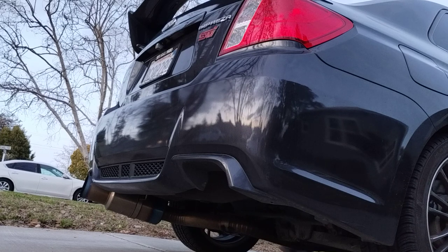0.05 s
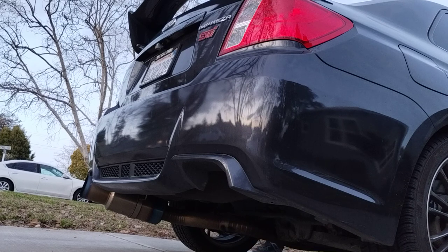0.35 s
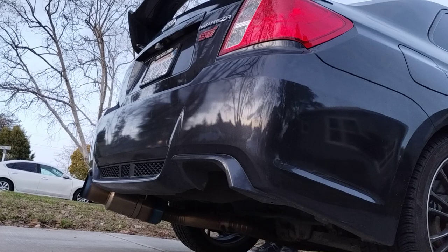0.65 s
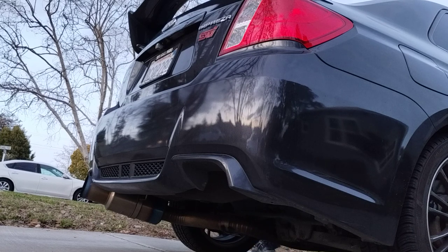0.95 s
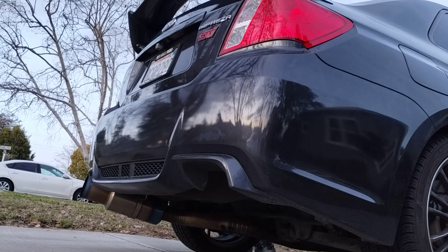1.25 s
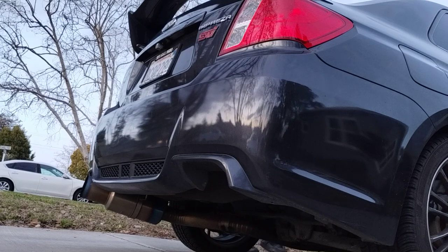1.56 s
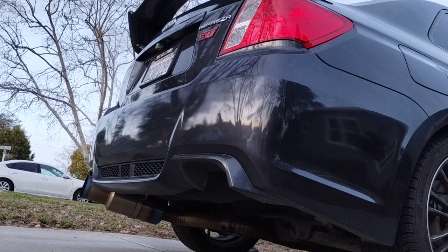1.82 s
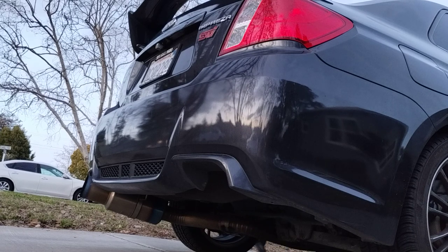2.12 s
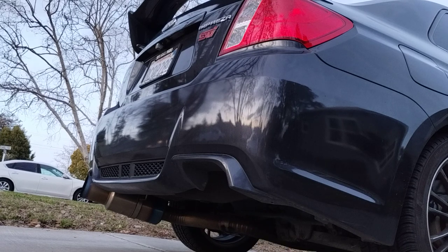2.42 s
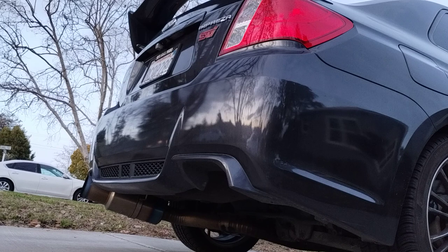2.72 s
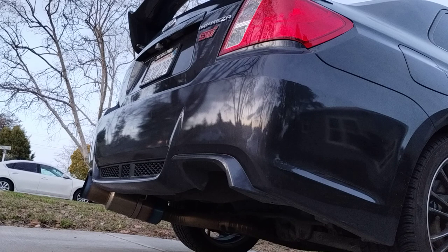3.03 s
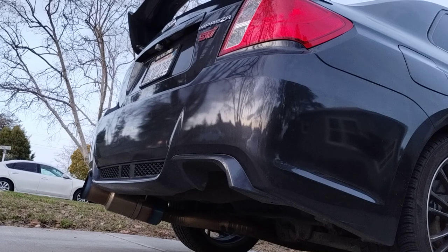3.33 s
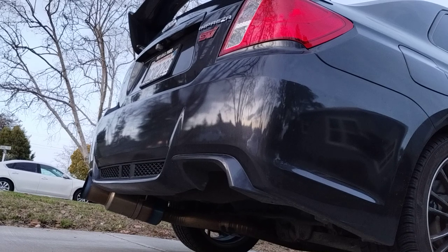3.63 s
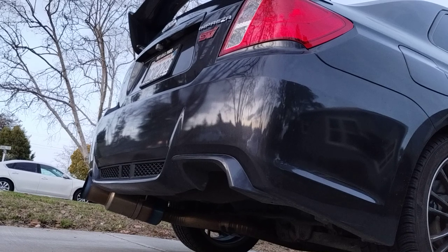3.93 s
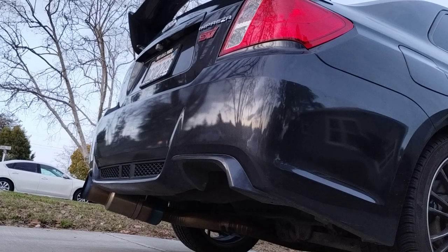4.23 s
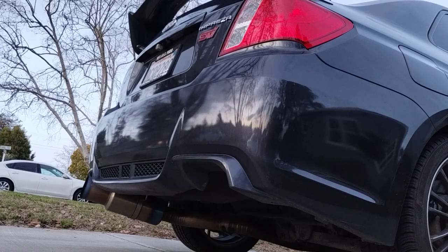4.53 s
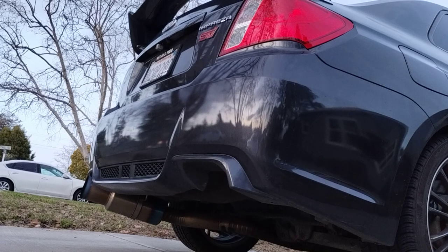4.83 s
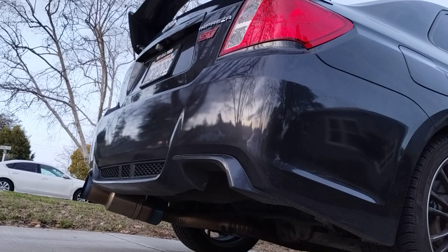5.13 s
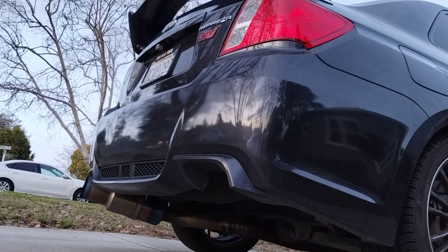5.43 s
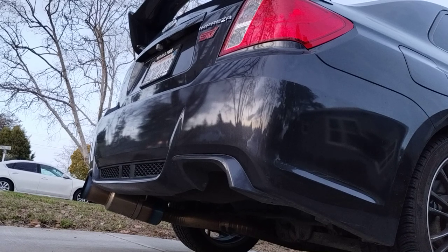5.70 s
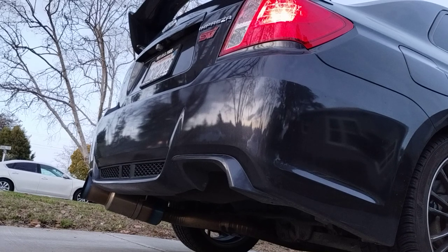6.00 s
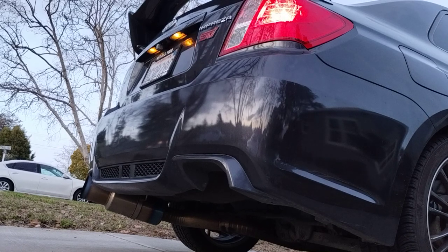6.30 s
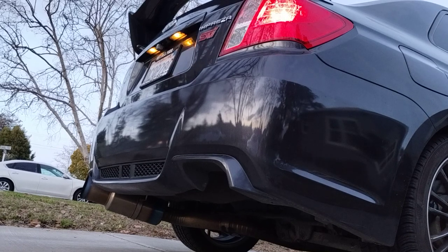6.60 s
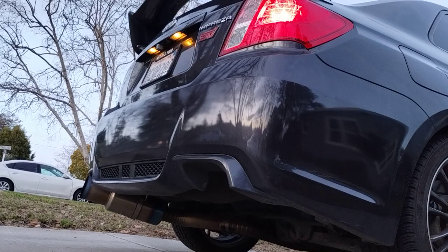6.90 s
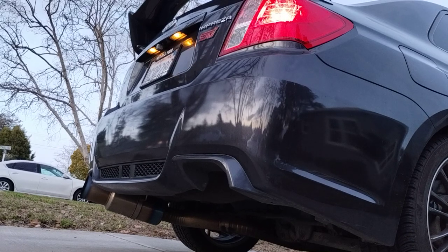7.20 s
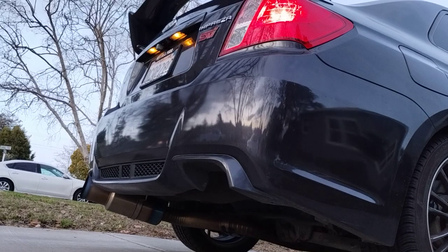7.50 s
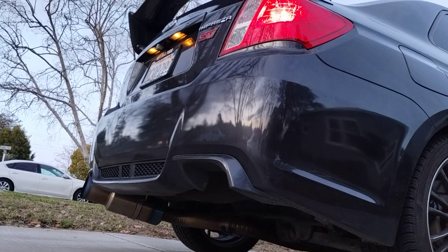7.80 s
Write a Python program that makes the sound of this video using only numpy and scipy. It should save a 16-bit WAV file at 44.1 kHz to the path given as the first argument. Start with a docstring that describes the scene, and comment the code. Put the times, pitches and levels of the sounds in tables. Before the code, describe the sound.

Heard from low behind a parked car on a quiet street, with a faint hum of distant traffic. A few soft steps and clicks come first, then the door latch clacks open. Someone climbs in with muffled thuds, faint cloth rustle and a light jingle of keys. The door slams with a deep boom. After a pause the starter clashes in and cranks the engine with a grinding whine, without it firing yet.

```python
"""Low behind a parked car on a quiet street, distant traffic hums throughout. Someone steps up, the latch
clacks and the door rings as it springs open. They climb in: cloth rustles, keys jingle and their weight
thuds into the body. A far bird calls faintly, then the door slams and the cabin booms at its resonances.
Last, the starter pinion clashes into the flywheel and its meshing teeth growl and whine, cranking the
engine over its first compressions while each unfired stroke puffs through the silencer."""
import sys
import numpy as np
from scipy import signal
from scipy.fft import rfft, irfft, next_fast_len
from scipy.io import wavfile
from scipy.ndimage import map_coordinates

SR = 44100
rng = np.random.default_rng(int(sys.argv[2]) if len(sys.argv) > 2 else 0)


def master(y):
    """Save y as 16-bit WAV."""
    cut = np.clip(np.atleast_2d(y).T, -1, 1)
    pcm = np.round(cut * 32767)  # scale
    wavfile.write(sys.argv[1], SR, pcm.astype(np.int16))


N = 350595
TIME = np.arange(N) / SR

# Decibels in all tables are relative: each source adds its own gain.
# the door lands: start_s, level_db
SLAM = [(5.38, -14.5)]
# cylinders pass their compression and push air down the pipe: start_s, puff_db, chuff_db, jolt_db
STROKES = [(7.467, -55, -51.5, 4.5), (7.645, -32, -48.5, 7), (7.821, -36, -49, 10.5)]
# spectrum of a hollow knock: frequency_hz, density_db
KNOCK_SPECTRUM = [(130, -32), (220, -4.5), (275, -5), (381, -3.5), (459, -15.5), (579, -9), (873, -19.5),
                  (1400, -25), (1820, -35), (3080, -120)]
# spectrum of the door's metal fittings: frequency_hz, density_db
CLACK_SPECTRUM = [(470, -27), (800, -5), (937, -9.5), (1180, -2.5), (1270, -6.5), (1480, -2.5),
                  (1960, -5.5), (2330, -5.5), (2680, -8.5), (2880, -6), (3310, -20), (6500, -21.5),
                  (8450, -40), (14300, -120)]
# left-right likeness of the engine bay: frequency_hz, correlation
ENGINE_LIKENESS = [(60, 1), (130, 0.98), (290, 0.92), (640, 0.36), (1410, -0.32), (3100, 0.17),
                   (6820, -0.28), (15000, -1.1)]
# left-right likeness of the door and cabin: frequency_hz, correlation
DOOR_LIKENESS = [(60, 1), (180, 1), (550, 0.7), (1650, 0.096), (4970, 0.018), (15000, 0.027)]
# left-right likeness of the street: frequency_hz, correlation
STREET_LIKENESS = [(60, 0.96), (150, 0.96), (380, 0.46), (950, -0.37), (2380, 0.029), (5980, -0.074),
                   (15000, -0.012)]


def amp(db):
    """Amplitude ratio of a level in decibels."""
    return np.exp(np.asarray(db) * (np.log(10) / 20))


def unit(x):
    """Normalisation to rms 1."""
    return x / np.sqrt(np.mean(x ** 2) + 1e-20)


def since(start_s):
    """Seconds elapsed since start_s, zero before it."""
    return np.maximum(TIME - start_s, 0)


def along(points, hz):
    """Interpolation of (frequency_hz, value) points on a logarithmic frequency axis."""
    frequencies, values = np.transpose(points)
    return np.interp(np.log(hz + 1), np.log(frequencies + 1), values)


def curve(points):
    """Linear interpolation of (time_s, value) points at every sample."""
    return np.interp(TIME, *np.transpose(points))


def wobble(rate_hz, size=N):
    """Smooth random modulation: a spline through rate_hz Gaussian knots a second."""
    knots = rng.standard_normal(int(size * rate_hz / SR) + 4)
    return map_coordinates(knots, [TIME[:size] * rate_hz])


def add(track, start_s, sound):
    """Superposition of a sound on the track from start_s."""
    part = track[:, max(round(start_s * SR), 0):][:, :sound.shape[-1]]
    part += sound[..., :part.shape[1]]


def filtered(x, response):
    """Linear filtering: the spectrum of x is multiplied by a frequency response."""
    size = x.shape[-1]
    padded = next_fast_len(size + 8192)
    return irfft(rfft(x, padded) * response(np.fft.rfftfreq(padded, 1 / SR)), padded)[..., :size]


def coloured(pair, spectrum, likeness):
    """Mid-side mixing gives two independent signals this spectrum and correlation, at rms 1."""
    def response(hz):
        angle = np.arccos(np.clip(along(likeness, hz), -1, 1)) / 2
        return amp(along(spectrum, hz)) * [np.cos(angle), np.sin(angle)]
    mid, side = filtered(pair, response)
    return unit(np.array([mid + side, mid - side]))


def burst(spectrum, likeness, attack_s, t60_s):
    """Modal overlap: a struck part with many close modes rings as decaying noise."""
    t = TIME[:SR // 4]
    rise = 1 - np.exp(-t / attack_s)
    envelope = rise * amp(-60 * t / t60_s)
    sound = rise * coloured(envelope * rng.standard_normal((2, len(t))), spectrum, likeness)
    return unit(sound) * np.sqrt(np.mean(envelope ** 2)) / envelope.max()


def ring(modes, attack_s):
    """Free vibration of damped modes, peak 1; higher modes differ more in phase between channels."""
    t = TIME[:SR // 2]
    sound = np.zeros((2, len(t)))
    for hz, db, t60_s in modes:
        phase = hz / 1500 * rng.standard_normal((2, 1))
        sound += amp(db - 60 * t / t60_s) * np.sin(2 * np.pi * hz * t + phase)
    sound *= 1 - np.exp(-t / attack_s)
    return sound / np.abs(sound).max()


def thump(hz, attack_s, t60_s):
    """Response of a damped low resonance to one push, peak 1."""
    t = TIME[:SR // 2]
    sound = np.sin(2 * np.pi * hz * t) * (1 - np.exp(-t / attack_s)) ** 2 * amp(-60 * t / t60_s)
    return sound / np.abs(sound).max()


def street():
    """Ambient noise: far traffic merges into a gently swelling hum under a faint, even hiss."""
    # spectra of the traffic and the hiss: frequency_hz, density_db
    hum_spectrum = [(15, -61), (25, -22), (54, -16), (75, -4.5), (124, 0), (162, -8), (262, -11),
                    (324, -17), (409, -14), (468, -17.5), (1380, -31.5), (2500, -42), (3250, -63),
                    (5500, -120)]
    hiss_spectrum = [(880, -23), (1500, -9.5), (2400, -9), (2540, -7.5), (3120, -8.5), (4440, -9.5),
                     (5670, -10), (7380, -10.5), (8710, -8), (15500, -17)]
    # swell of the traffic: time_s, level_db
    traffic = [(0.0, -58.5), (0.8, -56), (1.3, -56), (2.0, -56.5), (3.0, -60.5), (4.3, -56.5), (6.2, -56),
               (7.0, -56.5)]
    hum = coloured(rng.standard_normal((2, N)), hum_spectrum, STREET_LIKENESS)
    hiss = coloured(rng.standard_normal((2, N)), hiss_spectrum, STREET_LIKENESS)
    return amp(curve(traffic) - 2 + wobble(6.6)) * hum + amp(-78) * hiss


def bird():
    """Frequency modulation: thin whistles glide up and level off, made buzzy by random pitch scatter."""
    # a far bird's calls: start_s, length_s, start_hz, level_db
    calls = [(4.74, 0.21, 7120, -73.5), (4.99, 0.097, 7450, -73.5)]
    top_hz, glide_s, attack_s, scatter = 7500, 0.05, 0.0066, 0.045
    out, t = np.zeros((2, N)), TIME[:SR // 2]
    for start_s, length_s, start_hz, db in calls:
        swell = (1 - np.exp(-t / attack_s)) * np.exp(-(t / length_s) ** 2)
        flutter_db = 3.1 * wobble(56, len(t))
        buzz = np.array([wobble(2000, len(t)), wobble(2000, len(t))])
        glide_hz = top_hz + (start_hz - top_hz) * np.exp(-t / glide_s)
        cycles = np.cumsum(glide_hz * (1 + scatter * buzz), axis=1) / SR
        add(out, start_s, amp(db + flutter_db) * swell * np.sin(2 * np.pi * cycles))
    return out


def reverberation(sound):
    """Diffuse reflection from house fronts and trees: convolution with a decaying noise tail."""
    # reverberation time outdoors: frequency_hz, t60_s
    decay_times = [(100, 0.94), (500, 0.64), (2500, 0.99), (10000, 0.56)]
    tail_spectrum = [(100, -6), (2500, -13.5), (10000, -10.5)]  # frequency_hz, density_db
    hz, t, bands = signal.stft(rng.standard_normal((2, SR)), SR, nperseg=256)
    decay = amp(-60 * t / along(decay_times, hz)[:, None])
    _, tail = signal.istft(bands * decay, SR, nperseg=256)
    tail = coloured(tail, tail_spectrum, STREET_LIKENESS) / np.sqrt(SR)
    return signal.fftconvolve(sound, tail, axes=1)[:, :N]


def rustle():
    """Stick-slip friction: cloth slides on cloth in tiny uneven slips; each move rises, holds and fades."""
    # a sleeve or the seat cloth slides: start_s, length_s, level_db
    moves = [(0.905, 0.28, -81.5), (1.666, 0.66, -85.5), (1.825, 0.13, -73.5), (2.624, 0.01, -64.5),
             (2.707, .14, -68.5), (3.086, 0.38, -77), (3.308, 0.071, -69)]
    # spectrum of rubbing cloth: frequency_hz, density_db
    cloth_spectrum = [(880, -45), (1500, -1), (1700, -10), (2240, 0), (2860, 1.5), (3650, -5), (4990, -4),
                      (6960, -2.5), (8970, 5), (11000, -7), (11800, -9), (15500, -20.5)]
    attack_s, release_s = 0.006, 0.025
    climb_start_s, climb_end_s, fade_s = 1.4, 3.72, 0.35
    level = amp(-82.5) * (TIME > climb_start_s) * np.exp(-since(climb_end_s) / fade_s)  # faint shuffling
    for start_s, length_s, db in moves:
        move = (1 - np.exp(-since(start_s) / attack_s)) * np.exp(-since(start_s + length_s) / release_s)
        level = np.hypot(level, amp(db) * move)  # incoherent sounds add in power
    slips = rng.standard_normal((2, N)) * amp(2.2 * wobble(150) + 0.96 * wobble(24.27))
    return amp(4) * level * coloured(slips, cloth_spectrum, DOOR_LIKENESS)


def keys():
    """Light collisions excite the high modes of a bunch of keys in a soft shimmer."""
    # the bunch swings: start_s, level_db
    jingles = [(1.289, -64), (1.9294, -74), (2.1919, -68), (2.326, -67), (3.1094, -68), (3.2796, -57),
               (4.929, -69), (5.1637, -74)]
    # spectrum of the keys: frequency_hz, density_db
    key_spectrum = [(9500, -18), (10450, -20), (10760, 3), (11100, -25), (13100, -36), (13550, -11),
                    (13950, -28), (14550, -13), (15500, -24)]
    out = np.zeros((2, N))
    for start_s, db in jingles:
        add(out, start_s, amp(db - 7) * burst(key_spectrum, DOOR_LIKENESS, attack_s=0.0051, t60_s=0.29))
    return out


def clinks():
    """Modal ringing: light taps sound the same few modes of one small, loose metal part."""
    # taps on the part: start_s, level_db
    taps = [(2.04, -62.5), (2.24, -64), (2.975, -59), (3.19, -65), (5.559, -49)]
    # its modes: pitch_hz, level_db, t60_s
    modes = [(2190, -4, 0.067), (2344, -2, 0.076), (2536, -12, 0.027), (2820, -6, 0.041)]
    out = np.zeros((2, N))
    for start_s, db in taps:
        add(out, start_s, amp(db) * ring(modes, attack_s=0.0032))
    return out


def cabin():
    """Cavity resonance: the cabin rumbles under shifting weight, and the slam leaves it booming."""
    # spectrum of the cabin: frequency_hz, density_db
    boom_spectrum = [(30, -23), (45, -4.5), (62, 2.5), (95, 7.5), (135, 0), (200, -3), (300, -13.5),
                     (420, -12.5), (600, -18), (1300, -33), (3000, -45), (6000, -51.5)]
    attack_s, t60_s = 0.008, 0.88
    sway_start_s, sway_end_s = 1.4, 6.2
    t = since(SLAM[0][0])
    boom = (1 - np.exp(-t / attack_s)) * amp(-31 - 60 * t / t60_s)
    sway = amp(-62.5 + 3.5 * wobble(12)) * (TIME > sway_start_s) * (TIME < sway_end_s)
    return np.hypot(boom, sway) * coloured(rng.standard_normal((2, N)), boom_spectrum, DOOR_LIKENESS)


def clacks():
    """Inelastic bounces: metal parts clack and click; the click weakens faster, so a rattle grows duller."""
    # handle, latch and door fittings: start_s, clack_db, click_db, rattle_s
    contacts = [(0.598, -55.5, -76, .01), (0.6904, -64, -68.5, .01), (0.7653, -54.5, -63.5, .01),
                (0.846, -54, -66, .01), (1.4767, -67, -69, .01), (1.5671, -33.5, -47.5, .01),
                (1.5799, -34.5, -43.5, .03), (1.6241, -36.5, -64, .01), (1.7194, -60, -68, .03),
                (2.9444, -55, -69, .01), (3.314, -57, -59, .05), (5.3342, -44, -38.5, .01),
                (5.3565, -47, -43.5, .05), (5.483, -59, -55.5, .01), (5.5206, -43, -54, .03)]
    # spectrum of the sharp click: frequency_hz, density_db
    click_spectrum = [(2940, -32), (5000, -19), (5340, -36), (6310, -19.5), (7510, -20), (8910, -8.5),
                      (9300, -9), (10200, -21), (10900, -21), (12300, -31), (15500, -34)]
    gap_s, clack_loss_db, click_loss_db = 0.019, 1.94, 8  # per bounce
    out = np.zeros((2, N))
    for start_s, clack_db, click_db, rattle_s in contacts:
        for bounce, delay_s in enumerate(np.arange(0, rattle_s, gap_s)):
            clack = burst(CLACK_SPECTRUM, DOOR_LIKENESS, attack_s=0.00053, t60_s=0.18)
            click = burst(click_spectrum, DOOR_LIKENESS, attack_s=0.00053, t60_s=0.13)
            add(out, start_s + delay_s, amp(clack_db - bounce * clack_loss_db - 11) * clack)
            add(out, start_s + delay_s, amp(click_db - bounce * click_loss_db - 3.5) * click)
    return out


def thuds():
    """Soft, heavy impacts excite mainly low modes: the body booms, a panel knocks and fittings shake."""
    # steps, shifting weight and the door meeting its seal: start_s, thud_db, knock_db
    impacts = [(0.653, -32, -48), (0.682, -36, -45), (0.757, -47, -48), (1.41, -63, -59),
               (2.143, -36.5, -54.5), (3.274, -35, -55.5), (3.749, -42, -51), (3.908, -39.5, -56),
               (4.144, -57, -57), (4.263, -38, -57), (4.829, -39, -64.5), (5.036, -36, -64),
               (5.353, -20.5, -30), (5.527, -44, -40.5), (5.555, -37.5, -62), (5.632, -35, -47)]
    # spectrum of the body's thud: frequency_hz, density_db
    thud_spectrum = [(26, -35), (45, -11.5), (93, 7), (300, -23.5), (390, -55), (660, -120)]
    panel_spectrum = np.array(KNOCK_SPECTRUM) * [338 / 385, 1]  # the knock, shifted down in pitch
    settle_s, settle_loss_db = 0.042, 11.5  # each weight lands a second time, softer
    out = np.zeros((2, N))
    for start_s, thud_db, knock_db in impacts:
        add(out, start_s, amp(thud_db - 8) * thump(hz=149.4, attack_s=0.0025, t60_s=0.074))
        fittings = burst(CLACK_SPECTRUM, DOOR_LIKENESS, attack_s=0.0012, t60_s=0.22)
        add(out, start_s + 0.006, amp(knock_db - 18.5) * fittings)
        for landing_s, loss_db in [(start_s, 0), (start_s + settle_s, settle_loss_db)]:
            body = burst(thud_spectrum, DOOR_LIKENESS, attack_s=0.0024, t60_s=0.23)
            panel = burst(panel_spectrum, DOOR_LIKENESS, attack_s=0.0016, t60_s=0.17)
            add(out, landing_s, amp(thud_db - loss_db - 7.5) * body + amp(knock_db - loss_db) * panel)
    return out


def door():
    """Impulse excitation: the door rings as it springs open, then catches and lands with one deep push."""
    # the door springs off its seal: start_s, ring_db, knock_db
    releases = [(1.573, -28.5, -34.5), (1.588, -27, -35.5), (1.621, -36, -37.5), (1.655, -50, -47)]
    # the latch hooks the striker: start_s, level_db
    catches = [(5.3322, -35)]
    # modes of the free door, the striker, and the shut door with the cabin: pitch_hz, level_db, t60_s
    open_modes = [(111, -4.5, 0.64), (161.2, 5.5, 0.23), (265, -4.5, 0.12), (371, -8, 0.17),
                  (731, -11, 0.11), (1220, -27, 0.095), (1655, -24, .2), (2304, -20, 0.17),
                  (2940, -17, .11), (2960, -10, 0.13)]
    striker_modes = [(640, -2.5, 0.14), (1237, -7, 0.17), (1454, -16, 0.12), (1433, -10, 0.13),
                     (1660, -13, 0.25), (4480, -1.5, 0.035), (6500, -22, 0.074), (7670, -9, .1),
                     (8560, -8, .09), (8900, 5.5, 0.12)]
    shut_modes = [(68.9, 1, 0.5), (185, -22, 0.49), (253.4, -24.5, 1.8), (334, -10, 0.47), (358, -20, 0.33),
                  (552, -4.5, 0.14)]
    out = np.zeros((2, N))
    for start_s, ring_db, knock_db in releases:
        add(out, start_s, amp(ring_db - 1) * ring(open_modes, attack_s=0.0042))
        knock = burst(KNOCK_SPECTRUM, DOOR_LIKENESS, attack_s=0.0021, t60_s=0.16)
        add(out, start_s, amp(knock_db - 5.5) * knock)
    for start_s, db in catches:
        add(out, start_s, amp(db + 2.5) * ring(striker_modes, attack_s=0.0048))
    for start_s, db in SLAM:
        add(out, start_s, -amp(db - 8.5) * ring(shut_modes, attack_s=0.00078))
        add(out, start_s, -amp(db) * thump(hz=136, attack_s=0.00029, t60_s=0.063))
    return out


def exhaust():
    """Resonance of the silencer: each unfired stroke puffs through it and rings one low note."""
    out = np.zeros((2, N))
    for start_s, puff_db, chuff_db, _ in STROKES:
        puff = thump(hz=87.3, attack_s=0.0055, t60_s=0.2)
        chuff = burst(KNOCK_SPECTRUM, ENGINE_LIKENESS, attack_s=0.0029, t60_s=0.44)
        add(out, start_s, amp(puff_db + 2) * puff)
        add(out, start_s, amp(chuff_db + 5.5) * chuff)
    return out


def pinion():
    """Broadband impacts: the solenoid throws the pinion in; it bites again when the flywheel slows."""
    # the pinion strikes the ring gear: start_s, level_db
    strikes = [(7.431, -27), (7.4481, -19.5), (7.4554, -20.5), (7.4681, -13.5), (7.4754, -17.5),
               (7.82, -35)]
    # spectrum of the clashing teeth: frequency_hz, density_db
    clash_spectrum = [(59, -43.5), (100, -4), (188, -0.5), (313, -27), (487, -1), (917, -4), (1040, -13),
                      (1210, 2.5), (2470, -7), (3120, -3), (3390, -4.5), (5630, -15.5), (9540, -10),
                      (10600, -23), (15500, -31)]
    out = np.zeros((2, N))
    for start_s, db in strikes:
        clash = burst(clash_spectrum, ENGINE_LIKENESS, attack_s=0.0026, t60_s=0.08)
        add(out, start_s, amp(db - 13.5) * clash)
    return out


def bell_housing(grinding):
    """Forced vibration: grinding teeth drive the housing's modes as parallel resonators, at rms 1."""
    # modes of the housing: pitch_hz, bandwidth_hz, level_db
    modes = [(385, 47, -5), (486, 39, -8), (833, 23, -10), (1076, 68, 0.5), (1190, 21, -14),
             (1557, 28, 1.5), (2283, 25, 7.5), (2335, 21, 1), (2410, 53, -2), (2765, 17, 10),
             (2940, 67, -2.5), (3020, 19, -4), (3250, 32, -20), (3650, 23, -11)]
    drive_spectrum = [(150, -22), (400, 7), (3800, -4), (6000, -27)]  # frequency_hz, density_db

    def response(hz):
        return sum(amp(db) * 1j * hz * width_hz / (mode_hz ** 2 - hz ** 2 + 1j * hz * width_hz)
                   for mode_hz, width_hz, db in modes)
    return unit(filtered(coloured(grinding, drive_spectrum, ENGINE_LIKENESS), response))


def gear_whine(teeth):
    """Periodic meshing sounds harmonics of the tooth rate; teeth is the running count of teeth passed."""
    # harmonics of the mesh: multiple, level_db
    orders = [(1, -10.5), (2, 1), (3, -8), (4, -13.5)]
    # the whine swells: peak_s, level_db
    swells = [(7.578, -40), (7.609, -39.5), (7.649, -38.5), (7.902, -37)]
    floor_db, half_width_s = -48.5, 0.011
    swelling = sum(amp(db) * np.exp(-((TIME - peak_s) / half_width_s) ** 2) for peak_s, db in swells)
    flutter_db = 1.5 * np.array([wobble(50), wobble(50)])
    tone = sum(amp(db) * np.sin(2 * np.pi * multiple * teeth) for multiple, db in orders)
    return (amp(floor_db) + swelling) * amp(flutter_db) * tone


def starter():
    """Amplitude modulation: tooth contacts pulse the grinding noise, and each compression jolts it louder."""
    # meshing rate of the gears: time_s, tooth_rate_hz
    mesh_rate = [(7.5, 288), (7.61, 297), (7.69, 284), (7.85, 304), (7.95, 296)]
    # spectra of the low growl and the treble rasp: frequency_hz, density_db
    growl_spectrum = [(88, -33), (150, -10.5), (268, -15.5), (445, -18), (583, -3), (695, -6), (844, -9),
                      (930, -9.5), (1130, -8), (1730, -13.5), (2860, -14), (3480, -35), (5440, -25.5),
                      (9180, -30.5), (15500, -77)]
    rasp_spectrum = [(1180, -44), (2000, -3.5), (2310, -29), (2590, -1), (2720, -11), (3040, 5), (3260, -3),
                     (4360, -9), (4710, -8), (5130, -32), (7230, -23.5), (9270, -4), (10300, -14.5),
                     (13200, -21.5), (15500, -34)]
    # course of the rasp: time_s, level_db
    rasp_levels = [(7.5, -46), (7.54, -58), (7.73, -57), (7.765, -46), (7.81, -50), (7.85, -46),
                   (7.895, -49.5), (7.925, -42.5)]
    spin_up_s, jolt_attack_s, jolt_decay_s = (7.425, 7.48), 0.0078, 0.061
    jolt_db = np.zeros(N)
    for start_s, _, _, peak_db in STROKES:
        rise = np.minimum(since(start_s) / jolt_attack_s, 1)
        jolt_db += peak_db * rise * np.exp(-since(start_s + jolt_attack_s) / jolt_decay_s)
    growl_db = -43 + jolt_db
    rasp_db = curve(rasp_levels) + 6 + 0.36 * jolt_db
    teeth = np.cumsum(curve(mesh_rate) * (1 + 0.016 * wobble(90))) / SR
    # each tooth bites twice, going in and coming out, and no two bite alike
    contact = amp(1.5 * np.cos(2 * np.pi * 2 * teeth) + 1.51 * wobble(300))
    grinding = lambda: contact * rng.standard_normal((2, N))
    housing = amp(growl_db - 2.4) * bell_housing(grinding())
    growl = amp(growl_db) * coloured(grinding(), growl_spectrum, ENGINE_LIKENESS)
    rasp = amp(rasp_db) * coloured(grinding(), rasp_spectrum, ENGINE_LIKENESS)
    running = np.interp(TIME, spin_up_s, [0, 1])
    return running * (growl + housing + rasp + gear_whine(teeth))


def stereo_balance(hz):
    """Level difference at constant power: the highest treble leans far to the left."""
    # balance between the channels: frequency_hz, left_minus_right_db
    balance = [(400, 0.5), (1300, 2), (2600, 0), (4400, -4), (6500, -1.5), (9000, 27), (11500, 19.5),
               (15000, 16)]
    gains = np.array([amp(along(balance, hz)), np.ones_like(hz)])
    return gains / np.sqrt(np.mean(gains ** 2, axis=0))


def scene():
    """Superposition: the car and its echo, without deep bass and brighter on the left, over the street."""
    car = thuds() + door() + cabin() + clacks() + clinks() + keys() + rustle()
    car += pinion() + starter() + exhaust()
    car = signal.sosfilt(signal.butter(2, 48, "highpass", fs=SR, output="sos"), car)
    near = filtered(car + amp(-14) * reverberation(car), stereo_balance)
    return near + bird() + street()


def record(dry):
    """Band limiting: an ideal low-pass filter removes the very top of the treble."""
    cutoff_hz = 15720
    return filtered(dry, lambda hz: hz < cutoff_hz)


dry = scene()
out = record(dry)
master(out)
```